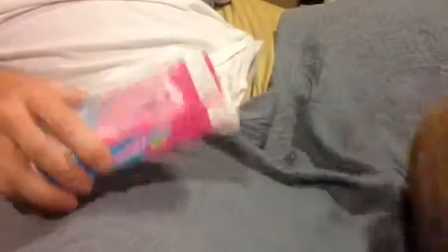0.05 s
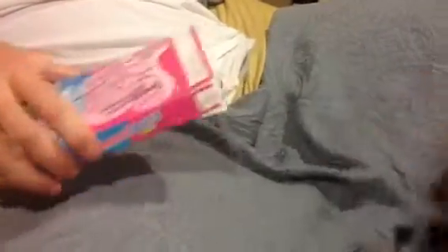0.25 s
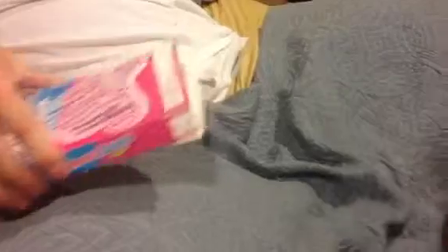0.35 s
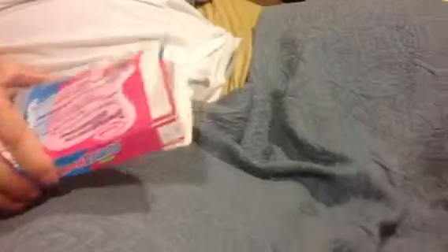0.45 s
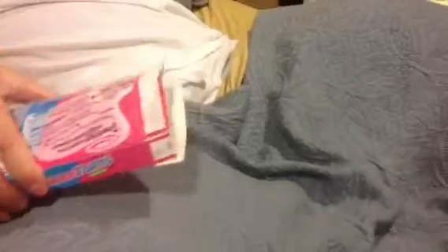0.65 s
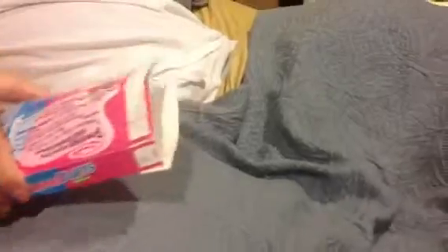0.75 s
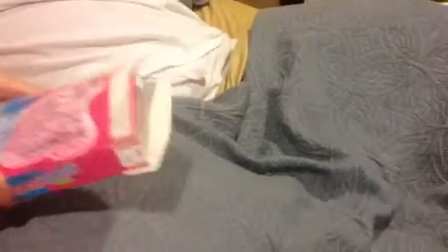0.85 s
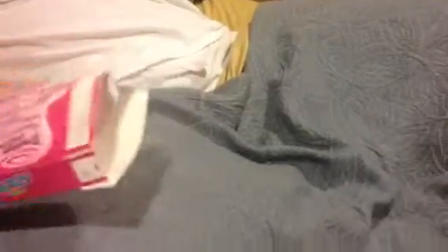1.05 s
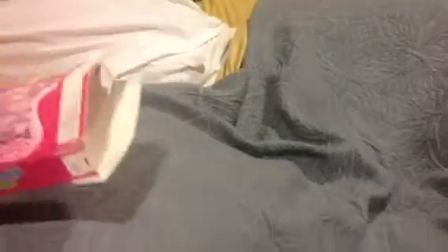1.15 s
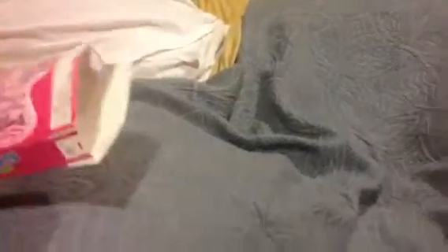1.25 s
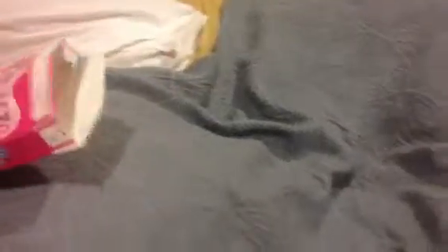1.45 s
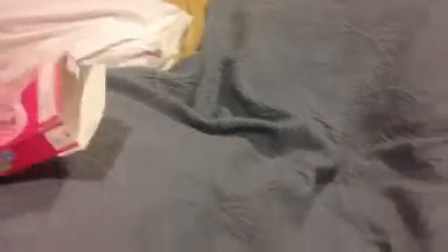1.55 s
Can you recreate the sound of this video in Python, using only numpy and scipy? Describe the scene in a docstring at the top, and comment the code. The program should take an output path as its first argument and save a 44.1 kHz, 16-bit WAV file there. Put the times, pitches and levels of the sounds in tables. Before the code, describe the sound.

Small hard candies rattle in a hand-tipped cardboard box, close up in a quiet room. A short surge starts at 0.2 seconds, then the loudest tumble runs from 0.45 to 0.9, with sharp clicks and a hollow knock near 0.6. A third surge comes around 1.1, with a slight flap crackle and soft bumps. The candies then slide with a light hiss and settle by 1.55 seconds.

```python
"""Small hard candies tumble in a cardboard box, tipped and shaken by hand three times in a quiet room.
Their random impacts come in surges and excite damped resonances: a patter of the card walls, a ticking
of shell on shell and a hollow tone of the whole box, with single harder knocks and one heavier landing.
The flexing card snaps, the flap crackles twice, the hand bumps the box and gliding shells hiss by friction.
A faint steady hiss lies underneath."""
import sys
import numpy as np
from scipy import signal
from scipy.fft import rfft, irfft
from scipy.io import wavfile
from scipy.ndimage import uniform_filter1d

SR = 44100
rng = np.random.default_rng(int(sys.argv[2]) if len(sys.argv) > 2 else 0)


def bounce(signal):
    """Save signal as a 16-bit WAV file at the path given by the first command-line argument."""
    frames = np.transpose(np.atleast_2d(signal))
    limited = np.clip(frames, -1, 1)
    pcm = np.round(limited * 32767).astype(np.int16)
    wavfile.write(sys.argv[1], SR, pcm)


N = 70560

# spectrum of the steady hiss and room tone: frequency_hz, gain_db
HISS_SPECTRUM = [(30, -21), (80, -25), (140, -0.5), (300, -1.5), (700, -0.5), (2000, -12), (3800, -11),
                 (5200, -9.5), (7000, -15), (9700, -20.5), (12000, -15.5), (15500, -16)]
# surges of the tumbling candies, before trim: time_s, patter_db, ticking_db
FLOW_LEVELS = [(0.0, -85, -101), (0.075, -75, -69), (0.196, -70, -60.5), (0.209, -45.5, -51.5),
               (0.251, -44.5, -45), (0.315, -44, -45), (0.346, -54, -54), (0.394, -59, -58.5),
               (0.424, -46, -48.5), (0.447, -63, -54.5), (0.463, -41, -45), (0.491, -42, -40),
               (0.521, -43, -42), (0.555, -41.5, -39), (0.593, -43.5, -44), (0.631, -38, -40.5),
               (0.653, -55, -47), (0.684, -43.5, -42), (0.724, -46, -49), (0.748, -43.5, -42.5),
               (0.795, -54.5, -51), (0.822, -46.5, -46), (0.856, -54.5, -53.5), (0.882, -49.5, -48.5),
               (0.922, -63, -60), (0.942, -58, -53.5), (0.981, -61.5, -59), (0.986, -50, -50),
               (1.016, -49.5, -43.5), (1.063, -47.5, -46), (1.087, -48, -41), (1.109, -46, -45),
               (1.137, -45, -39), (1.225, -50.5, -51), (1.309, -52.5, -52.5), (1.422, -58.5, -56.5),
               (1.439, -71, -65), (1.467, -60, -55.5), (1.493, -69.5, -64.5), (1.596, -87, -63)]
# spectrum of impacts on the card walls: frequency_hz, gain_db
PATTER_SPECTRUM = [(60, -51), (130, -31), (240, -18), (380, -14.5), (560, -7), (720, -1.5), (930, -5.5),
                   (1300, -1.5), (1800, -10), (2500, -13.5), (5000, -48.5)]
# spectrum of impacts of shell on shell: frequency_hz, gain_db
TICKING_SPECTRUM = [(700, -44), (1500, -5.5), (2200, -8.5), (3300, -4), (4500, -2.5), (5250, 0),
                    (6200, -7.5), (7800, -15.5), (9600, -28), (11500, -21.5), (15500, -39)]
# narrow modes of the box and the air in it: pitch_hz, width_hz, gain_db
BOX_RESONANCES = [(629, 28, 0.5), (890, 79, 0.5), (1005, 113, -2.5), (1588.5, 20, 3), (2640, 123, 0),
                  (4080, 78, 0.5), (5140, 120, -6)]
# envelope of the hollow tone of the whole box, before trim: time_s, level_db
HOLLOW_LEVELS = [(0.0, -73.5), (0.17, -71.5), (0.266, -49.5), (0.385, -67.5), (0.498, -47.5),
                 (0.672, -55.5), (0.734, -52.5), (0.788, -58), (0.89, -56.5), (0.966, -66.5),
                 (0.998, -55.5), (1.114, -53.5), (1.14, -47), (1.212, -59.5), (1.318, -54), (1.435, -71),
                 (1.465, -54.5), (1.55, -95)]
# modes of that hollow tone: pitch_hz, width_hz, gain_db
HOLLOW_RESONANCES = [(333.5, 45.6, -4), (417.4, 37.4, 0.5), (483.3, 45, -0.5)]
# single hard impacts: start_s, thud_db, clack_db, shell_pitch_hz
HARD_IMPACTS = [(0.1076, -44, -48, 4700), (0.1388, -51, -56, 5000), (0.3148, -35, -31, 3900),
                (0.4193, -37, -39, 4800), (0.4817, -29, -28, 4900), (0.4992, -35, -27, 4200),
                (0.501, -34, -33, 2600), (0.5272, -31, -37, 4300), (0.5688, -33, -29, 4600),
                (0.6081, -38, -31, 5100), (0.6325, -29, -36, 2800), (0.6826, -31, -23, 5300),
                (0.6886, -37, -27, 5200), (0.8235, -37, -35, 3700), (0.9618, -38, -42, 2200),
                (1.016, -46, -35, 3800), (1.0512, -46, -33, 4100), (1.0993, -32, -27, 3500),
                (1.126, -40, -29, 5000), (1.1437, -40, -30, 5200), (1.2172, -39, -38, 5100),
                (1.2796, -40, -43, 4500), (1.3151, -48, -40, 5100), (1.3445, -46, -41, 4900),
                (1.394, -44, -45, 5000), (1.446, -51, -44, 3300), (1.458, -40, -45, 4900),
                (1.471, -37, -47, 4000), (1.526, -49, -43, 4900)]
# modes of a shell, a broad crack and two close tones: pitch_ratio, width_hz, gain_db
SHELL_RESONANCES = [(.75, 2000, 1), (1, 610, 1.5), (1.1, 560, -16)]
# crackles of the flap: start_s, level_db
FLAP_CRACKLES = [(0.249, -49), (1.1448, -47.5)]
# modes of the end wall under the landing heap: pitch_hz, width_hz, peak_db
END_WALL_RESONANCES = [(910, 48, -34), (1020, 56, -38)]
# soft bumps of hand and box: start_s, pitch_hz, level_db
HAND_BUMPS = [(0.948, 158, -44), (1.138, 233, -42), (1.523, 387, -42)]
# envelope of candies gliding on the card: time_s, level_db
GLIDE_LEVELS = [(1.1, -95), (1.22, -54), (1.42, -57.5), (1.5, -84), (1.56, -61)]

CONTACTS_PER_S, LOUD_FLOW_DB = 1500, -44   # contact rate at this ticking level of the flow
TIME_S = np.arange(N) / SR


def from_db(db):
    """Amplitude grows tenfold for every 20 dB."""
    return 10 ** (np.asarray(db) / 20)


def rms_one(x):
    """Normalisation to unit mean power."""
    return x / np.sqrt(np.mean(x ** 2) + 1e-20)


def butterworth(x, order, edges_hz, kind):
    """A maximally flat filter passes one range of frequencies."""
    return signal.sosfilt(signal.butter(order, edges_hz, kind, fs=SR, output="sos"), x)


def resonate(x, hz, width_hz):
    """A damped oscillator: two poles, with unit gain at resonance."""
    r = np.exp(-np.pi * width_hz / SR)
    feedback = [1, -2 * r * np.cos(2 * np.pi * hz / SR), r * r]
    return signal.lfilter(np.array([1, 0, -1]) * (1 - r * r) / 2, feedback, x + 1e-18)


def colour(x, spectrum):
    """Minimum-phase filtering: folding the cepstrum gives a causal response with the given spectrum."""
    size = 2 * N
    hz, db = np.transpose(spectrum)
    bins_hz = np.arange(N + 1) * SR / size
    gain = from_db(np.interp(np.log(bins_hz + 1), np.log(hz), db))
    cepstrum = irfft(np.log(gain))
    cepstrum[1:N] *= 2
    cepstrum[N + 1:] = 0
    return irfft(rfft(x, size) * np.exp(rfft(cepstrum)))[:N]


def even(x, span_s=0.056):
    """Division by the running rms steadies the level and leaves single impacts standing."""
    span = int(span_s * SR)
    power = uniform_filter1d(uniform_filter1d(x ** 2, span), span)
    return x / np.sqrt(np.abs(power) + 1e-3 * np.mean(x ** 2))


def box(x):
    """Forced vibration: the narrow modes of the box ring on top of the direct sound."""
    return x + sum(from_db(db) * resonate(x, hz, width) for hz, width, db in BOX_RESONANCES)


def room(x, wet_db=0.5, t60_s=0.067):
    """Reverberation: diffuse reflections in and near the box begin after 1 ms and decay exponentially."""
    t = np.arange(SR // 4) / SR
    tail = rng.standard_normal(len(t)) * from_db(-60 * t / t60_s) * (t > .001)
    return x + from_db(wet_db) * signal.fftconvolve(x, tail / np.linalg.norm(tail))[:N]


def hiss(level_db=-67.5):
    """Stationary coloured noise forms the faint hiss and room tone."""
    return from_db(level_db) * rms_one(colour(rng.standard_normal(N), HISS_SPECTRUM))


def grains(clicks, pitches_hz, spread_db=4.0):
    """Modal excitation: each contact strikes heavily damped resonances with strengths of its own."""
    relative_width = pitches_hz[1] / pitches_hz[0] - 1
    out = np.zeros(N)
    for k, hz in enumerate(pitches_hz):
        strength = from_db(spread_db * np.clip(rng.standard_normal(N), -2, 2))
        out += (-1) ** k * resonate(clicks * strength, hz, relative_width * hz)
    return out


def scattered(clicks, pitches_hz, places=5):
    """Reflections depend on source position: each place of contact in the box has its own tail."""
    place = rng.integers(0, places, N)
    return sum(room(grains(clicks * (place == k), pitches_hz)) for k in range(places))


def hollow(clicks, band_hz=(282, 595), trim_db=-1):
    """Body resonance: the contacts drive the low modes of the whole box."""
    modes = sum((-1) ** k * from_db(db) * resonate(clicks, hz, width)
                for k, (hz, width, db) in enumerate(HOLLOW_RESONANCES))
    level_db = np.interp(TIME_S, *np.transpose(HOLLOW_LEVELS))
    return from_db(level_db + trim_db) * even(butterworth(modes, 2, band_hz, "band"))


def tumbling(rate_exponent=.75, size_spread_db=3.5, trim_db=-.5):
    """Shot noise: random impacts, denser as the flow swells, sound the walls, the shells and the box."""
    times_s, *levels = np.transpose(FLOW_LEVELS)
    patter_db, ticking_db = [np.interp(TIME_S, times_s, level) for level in levels]
    rate_per_s = CONTACTS_PER_S * from_db(rate_exponent * (ticking_db - LOUD_FLOW_DB))
    contacts = (rng.random(N) < rate_per_s / SR) * rng.choice([-1, 1], N)
    clicks = contacts * from_db(size_spread_db * np.minimum(rng.exponential(1, N), 4))
    walls = scattered(clicks, pitches_hz=np.geomspace(120, 3500, 12))
    shells = scattered(clicks, pitches_hz=np.geomspace(1200, 15000, 12))
    patter = from_db(patter_db + trim_db) * even(box(colour(walls, PATTER_SPECTRUM)))
    ticking = from_db(ticking_db + trim_db) * even(box(colour(shells, TICKING_SPECTRUM)))
    return patter + ticking + hollow(clicks)


def creases(snaps_per_s=780, relative_db=-23):
    """Flexure under load: the card gives tiny bright snaps, whose level follows the ticking."""
    times_s, _, ticking_db = np.transpose(FLOW_LEVELS)
    clicks = (rng.random(N) < snaps_per_s / SR) * rng.standard_normal(N)
    pitches_hz = np.geomspace(7500, 14500, 10)
    pitch_index = rng.integers(0, len(pitches_hz), N)
    snaps = sum(resonate(clicks * (pitch_index == k), hz, hz / 10) * (SR / hz) ** 2
                for k, hz in enumerate(pitches_hz))
    return from_db(np.interp(TIME_S, times_s, ticking_db) + relative_db) * rms_one(room(snaps))


def knocks(touches=3, gap_s=.0007, loss_db=10.5, thud_hz=890, thud_width_hz=450, band_hz=(270, 6200)):
    """Inelastic rebound: a candy hits ever more weakly, making the wall thud and its own shell clack."""
    out = np.zeros(N)
    for start_s, thud_db, clack_db, shell_hz in HARD_IMPACTS:
        gaps_s = gap_s * rng.uniform(.5, 2.2, touches)
        touches_s = start_s + np.cumsum(gaps_s) - gaps_s[0]
        clicks = np.zeros(N)
        clicks[(touches_s * SR).astype(int)] = from_db(-loss_db * np.arange(touches))
        shell_modes = [(shell_hz * ratio, width, clack_db + db) for ratio, width, db in SHELL_RESONANCES]
        for hz, width, db in [(thud_hz, thud_width_hz, thud_db)] + shell_modes:
            unit_ring = SR / (2 * np.pi * width)   # makes the starting amplitude independent of damping
            out += from_db(db) * unit_ring * resonate(clicks, hz, width)
    out = butterworth(out, 6, band_hz[1], "low")
    out = butterworth(out, 2, band_hz[0], "high")
    return room(box(out), wet_db=-8.5)


def flap(t60_s=.045, band_hz=(7060, 13000)):
    """Broadband transients: each crackle of the card flap is bright noise in exponential decay."""
    envelope = sum((TIME_S >= start_s) * from_db(db - 60 * np.abs(TIME_S - start_s) / t60_s)
                   for start_s, db in FLAP_CRACKLES)
    return envelope * rms_one(butterworth(rng.standard_normal(N), 2, band_hz, "band"))


def landing(end_s=.632, build_s=0.015):
    """Panel resonance: the heap piles ever harder into the end wall, which gives a hollow knock."""
    build = (TIME_S < end_s) * np.exp(-np.abs(end_s - TIME_S) / build_s)
    push = (rng.random(N) < CONTACTS_PER_S / SR) * rng.standard_normal(N) * build
    rings = [(resonate(push, hz, width), db) for hz, width, db in END_WALL_RESONANCES]
    return sum(from_db(db) * ring / np.abs(ring).max() for ring, db in rings)


def bumps(width_hz=85, contact_s=0.0022, low_hz=105):
    """Damped free vibration: a soft push of the hand sets the box swinging for a few low cycles."""
    out = np.zeros(N)
    for start_s, hz, db in HAND_BUMPS:
        age_s = np.maximum(TIME_S - start_s, 0)
        envelope = (1 - np.exp(-age_s / contact_s)) * np.exp(-np.pi * width_hz * age_s)
        out += from_db(db) * envelope * np.sin(2 * np.pi * hz * age_s)
    return butterworth(out, 3, low_hz, "high")   # the box radiates little below low_hz


def glide(centre_hz=5110, width_hz=1140):
    """Sliding friction: smooth shells rubbing along the card make a narrow, high hiss."""
    rub = resonate(rng.standard_normal(N), centre_hz, width_hz)
    rub = resonate(rub, centre_hz, width_hz)
    return from_db(np.interp(TIME_S, *np.transpose(GLIDE_LEVELS))) * rms_one(rub)


def scene():
    """Superposition: the sounds of candies, card, hand and room add at one close point."""
    return (hiss() + tumbling() + creases() + knocks() + flap() + landing() + bumps() + glide())[None]


def record(dry):
    """Band limiting: an elliptic low-pass cuts the highest treble steeply."""
    cutoff_hz = 15500
    return signal.sosfilt(signal.ellip(10, .1, 80, cutoff_hz, fs=SR, output="sos"), dry)


dry = scene()
out = record(dry)
bounce(out)
```